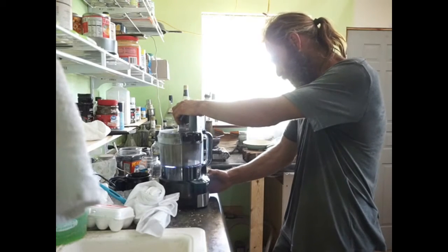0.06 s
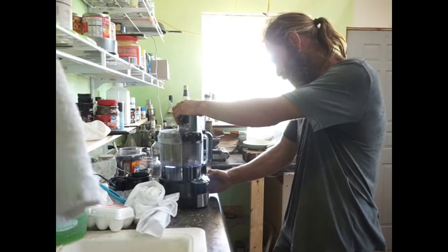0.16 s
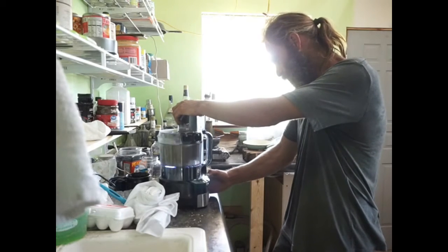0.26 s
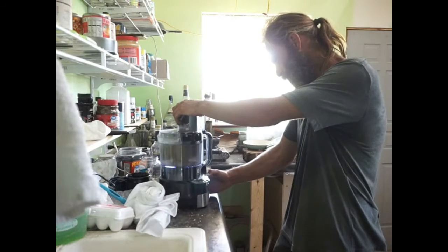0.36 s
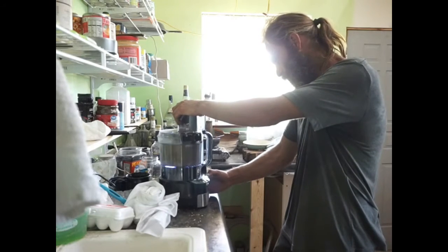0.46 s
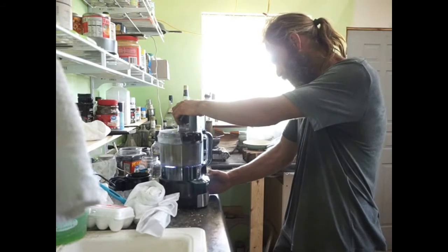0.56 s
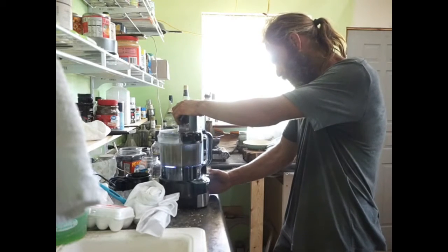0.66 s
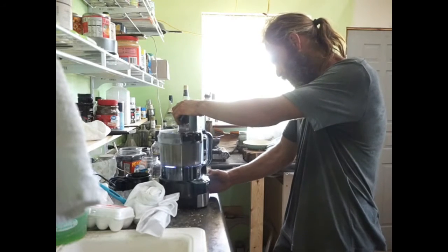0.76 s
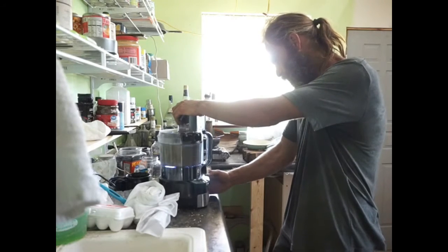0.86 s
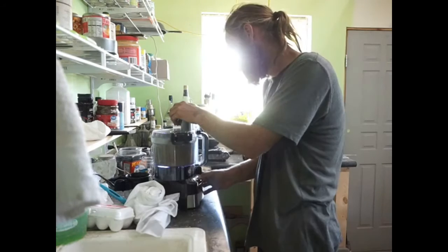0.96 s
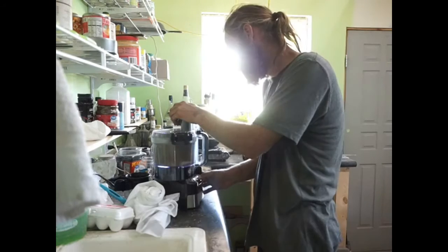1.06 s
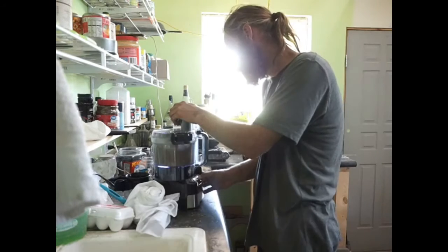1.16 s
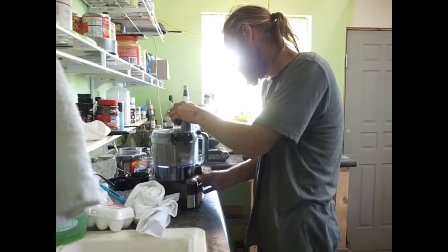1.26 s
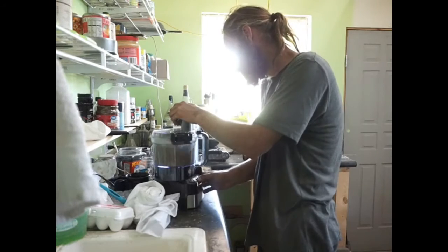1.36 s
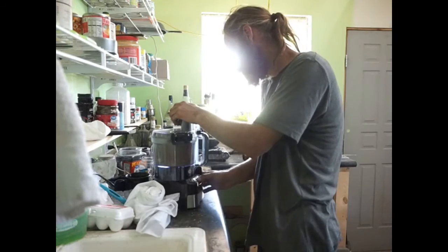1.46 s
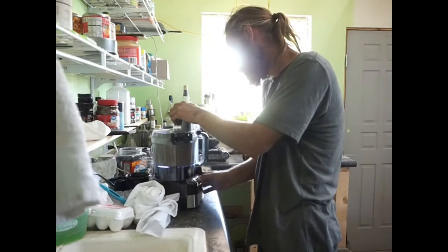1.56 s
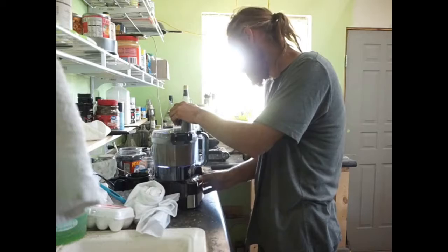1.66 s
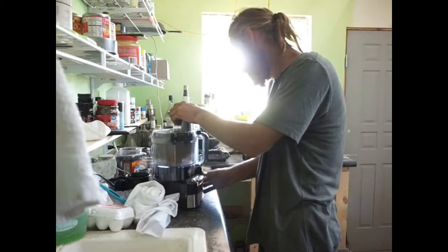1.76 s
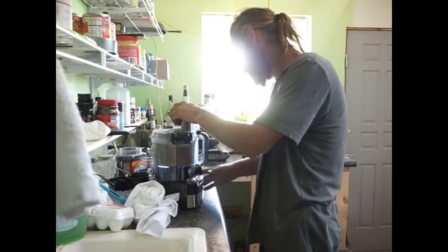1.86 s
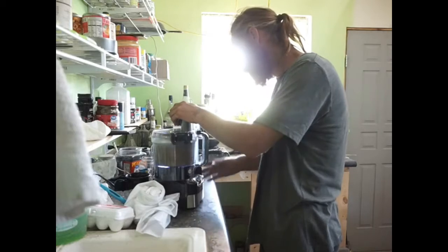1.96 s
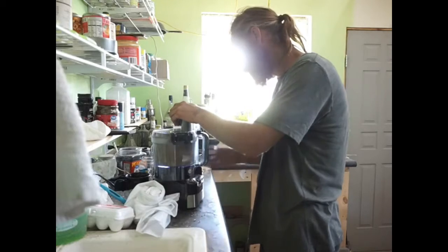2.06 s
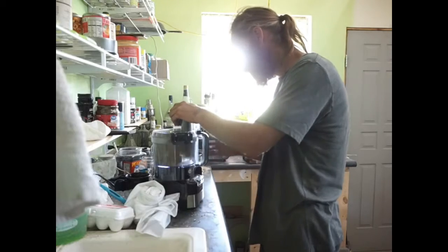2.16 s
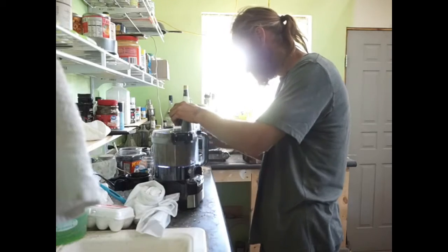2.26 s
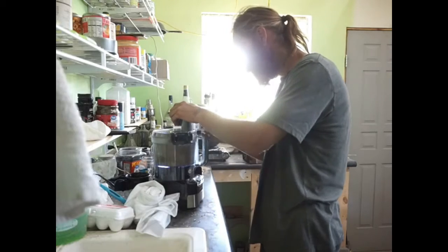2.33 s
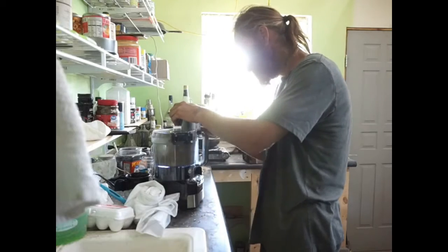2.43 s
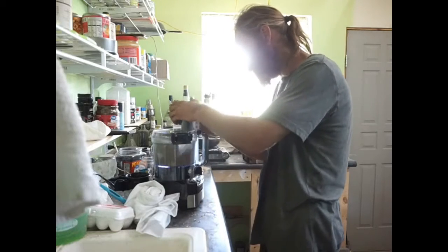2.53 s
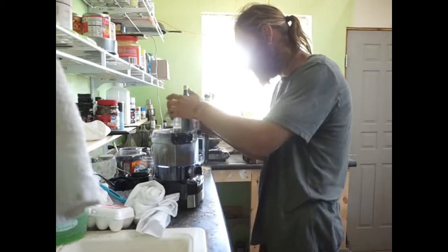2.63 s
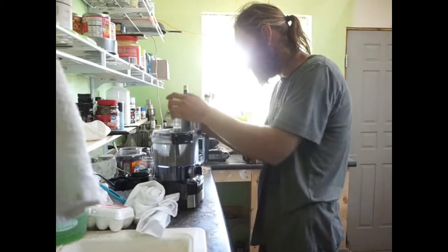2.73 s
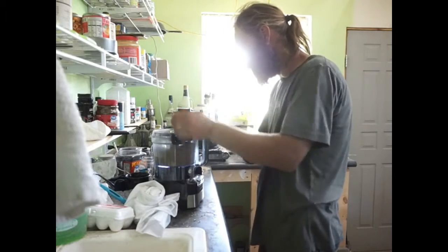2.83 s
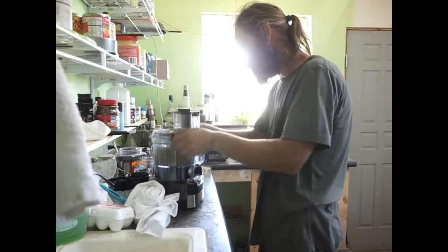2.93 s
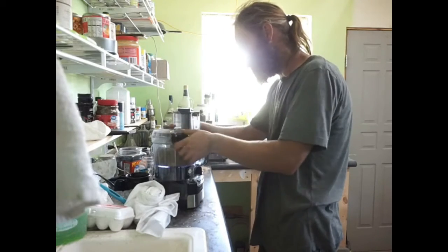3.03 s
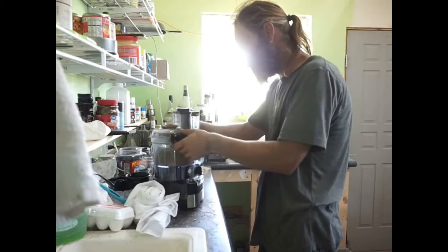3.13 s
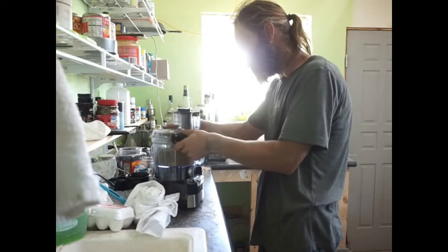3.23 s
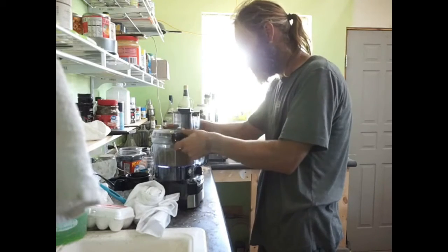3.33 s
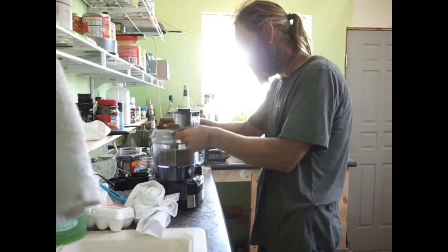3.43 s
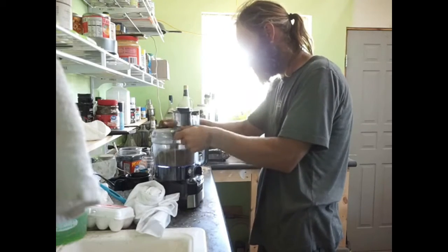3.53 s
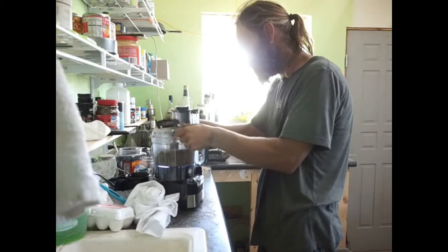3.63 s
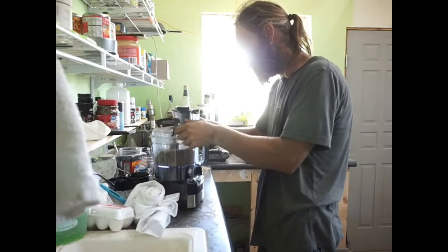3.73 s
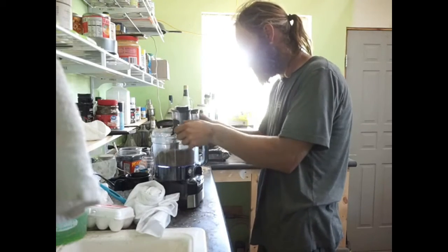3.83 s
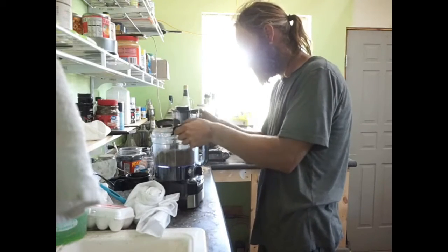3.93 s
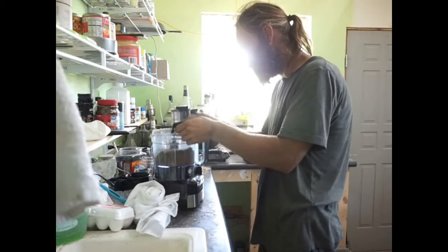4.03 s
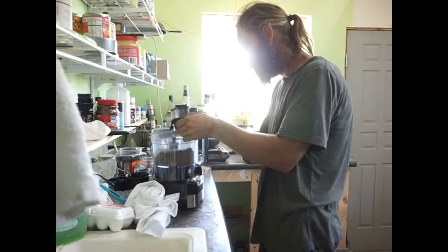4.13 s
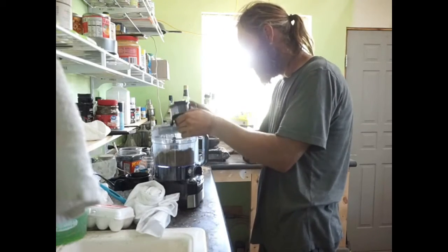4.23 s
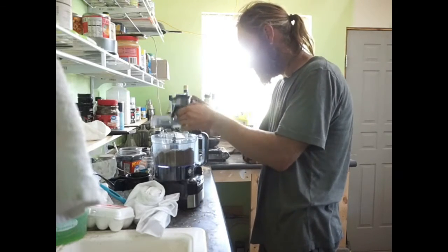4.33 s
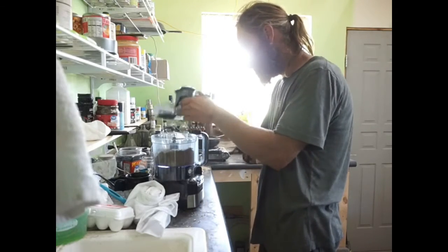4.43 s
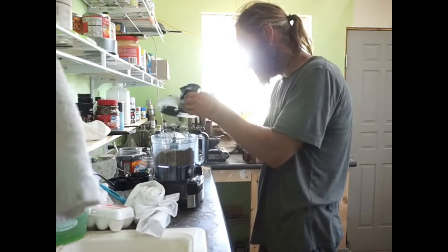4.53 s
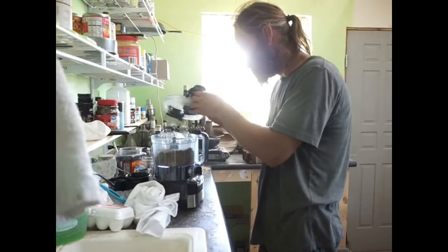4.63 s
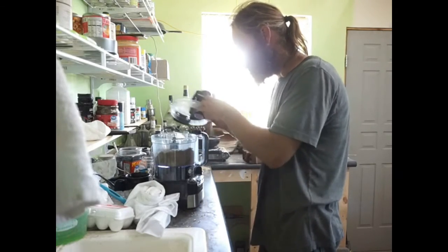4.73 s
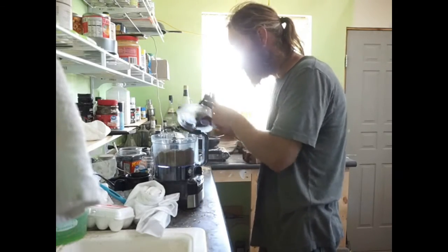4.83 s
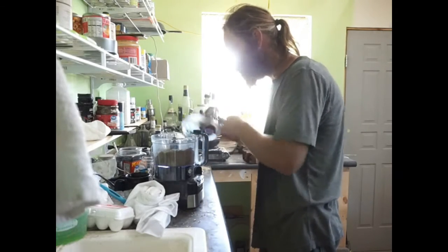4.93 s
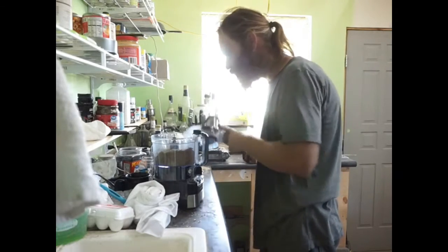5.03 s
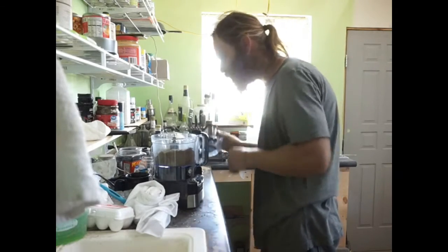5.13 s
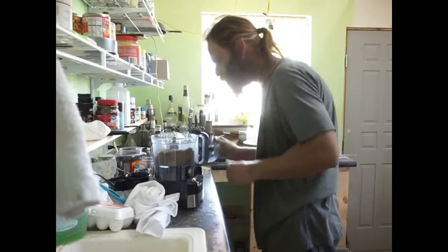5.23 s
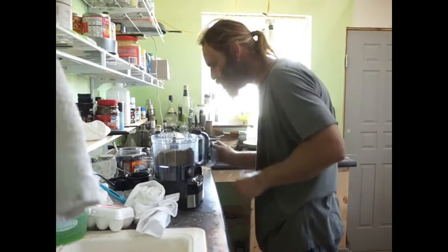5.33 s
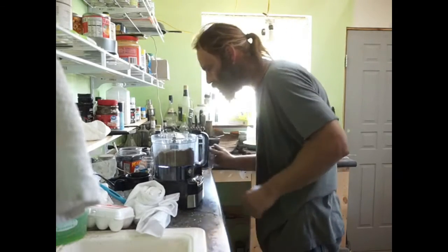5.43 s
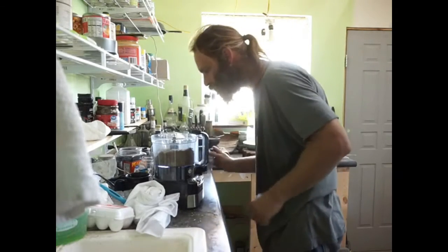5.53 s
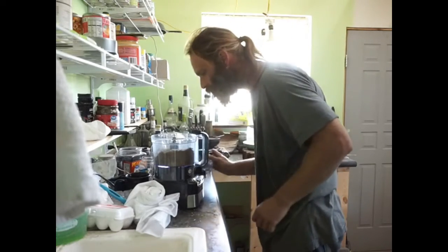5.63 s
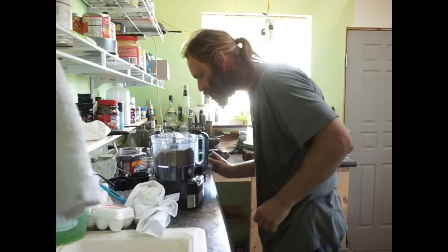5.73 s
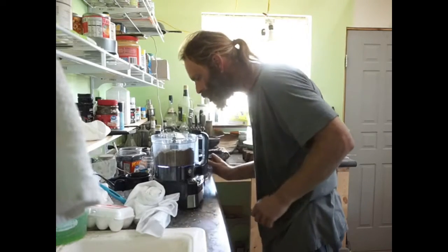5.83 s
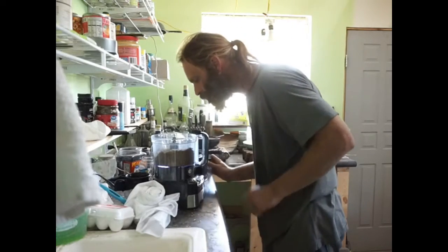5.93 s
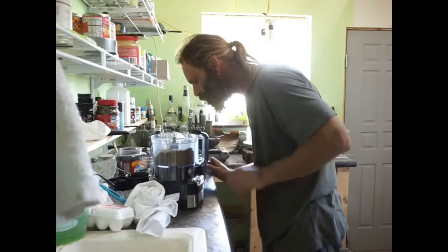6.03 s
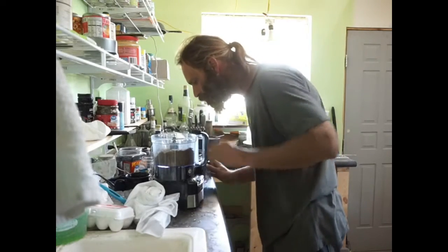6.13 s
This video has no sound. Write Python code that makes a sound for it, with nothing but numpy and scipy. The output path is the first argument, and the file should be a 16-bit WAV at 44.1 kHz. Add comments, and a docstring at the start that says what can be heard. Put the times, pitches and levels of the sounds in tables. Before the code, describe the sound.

A food processor runs close by in a small kitchen, its high unsteady whine over a loud gritty rattle of dry food. It drops in pitch after about a second, then is switched off and slides down to rest. Then the plastic lid rubs, squeaks and clicks free, is put down with hard clacks, and the bowl is scraped and knocked. Faint steady room noise remains.

```python
"""A food processor churns a dry mix in a small kitchen, drops to a lower speed, is switched off and coasts to rest.
One shaft-speed curve drives it all: a whine at ten times the shaft rate, hum, whirr, and noise for the flung food.
Then the lid is twisted loose with a gliding squeak, lifted and set down, and the bowl is gripped and knocked:
noise bursts ring plastic modes for the contacts, and grainy noise makes the rubbing. Room noise lies beneath."""
import sys
import numpy as np
from scipy import signal
from scipy.fft import rfft, irfft, next_fast_len
from scipy.io import wavfile
from scipy.ndimage import uniform_filter1d, map_coordinates

SR = 44100
rng = np.random.default_rng(int(sys.argv[2]) if len(sys.argv) > 2 else 0)


def wrap_up_sound(samples):
    """Save the sound to the file named by the first command line argument, as 16-bit audio."""
    columns = np.atleast_2d(samples).T
    # keep every value between -1 and 1, then stretch to whole-number steps
    tamed = np.clip(columns, -1, 1)
    steps = np.round(tamed * 32767).astype(np.int16)
    wavfile.write(sys.argv[1], SR, steps)


N = 272538

# Room noise spectrum: f/Hz, relative level/dB per Hz
AIR_SPECTRUM = [(24, -89), (40, -70), (70, -39), (212, -35), (302, -13.5), (450, -16.5), (703, -8.5),
                (810, -7.5), (1000, -16), (1100, -7), (1180, -10.5), (1490, -13), (2390, -15.5),
                (2750, -18), (11000, -45.5), (14300, -77), (22000, -120)]
# Resonances in the room noise: f/Hz, width/Hz, lift/dB
AIR_RESONANCES = [(77, 13, 10), (300, 17, 3), (697.5, 33, 11), (989, 6.8, 22.5)]
# Likeness of the two microphones in diffuse sound: f/Hz, correlation (-1 to 1)
MIC_LIKENESS = [(40, .5), (150, .95), (350, .94), (700, .88), (1400, .83), (2800, .72), (4000, .42),
                (5300, .22), (7000, .55), (10000, .52)]
# Decay of the kitchen echo: f/Hz, t60/s
KITCHEN_DECAY = [(150, 0.054), (500, 0.24), (1500, 0.24), (3000, 0.25), (9000, 0.46)]
# Phase by which the left microphone leads (negative: lags): f/Hz, phase/rad
LEFT_LEAD = [(600, -0.26), (1500, 0.73), (2800, 0.68), (4000, 1.57), (5000, 1.5), (6500, 1.2),
             (11000, -1.5)]

# Squeaks of the sticking, slipping lid: t/s, hold/s, f/Hz, glide/Hz per s, level/dB before the stutter,
# pitch scatter (share), stutter/dB, fade/dB per s
LID_SQUEAKS = [(3.413, 0.0044, 2477, 700, -27, 0.0547, 6, 237),
               (3.612, 0.0077, 899, -500, -29.5, 0.0059, -1, 700),
               (3.652, 0.028, 879, -150, -36, 0.0094, -1, 450)]
# Plastic sliding on plastic: t/s, hold/s, rub level/dB, scratch level/dB, f/Hz of the resonance lifted most
SLIDE_STROKES = [(3.042, 0.044, -53.5, -40, 4100), (3.242, 0.0061, -67, -52, 4030),
                 (3.689, 0.0096, -41.5, -39.5, 2380), (4.051, 0.13, -47, -43.5, 2440),
                 (5.81, 0.005, -36, -39.5, 3220), (5.878, 0.059, -47.5, -48, 2520),
                 (5.947, 0.043, -43.5, -43, 3200), (6.007, 0.084, -43, -39, 3130),
                 (6.09, 0.005, -30, -35.5, 3140), (6.17, 0.02, -52, -46, 2430)]
# Low rubbing spectrum: f/Hz, relative level/dB per Hz
RUB_SPECTRUM = [(120, -34), (240, -39), (300, -12), (430, -2), (560, -3.5), (720, 6.5), (1150, -1),
                (1500, -4), (1900, -30)]
# Resonance of the rub: f/Hz, width/Hz, lift/dB
RUB_RESONANCES = [(640, 39, 4.2)]
# High scratching spectrum: f/Hz, relative level/dB per Hz
SCRATCH_SPECTRUM = [(1200, 0.5), (1600, -1.5), (2300, 6.5), (3100, -1.5), (3700, -1), (4400, -3.5),
                    (5200, -9), (8000, -19.5), (11000, -16.5)]
# Lid and bowl contacts, and one small ping as the blade coasts, in three registers:
# t/s, level/dB, clack f/Hz, knock level/dB re clack, knock f/Hz, thud level/dB re clack, thud f/Hz,
# snap level/dB re clack, ringing/dB re chatter, first tap/dB re chatter
CONTACTS = [(2.455, -49, 2800, -20, 900, -32, 300, -22, 15, -12),
            (2.6423, -49, 2700, 6.5, 800, -11.5, 235, -5.5, -1.5, -10),
            (3.055, -69, 4130, 7, 2400, -30, 400, -13, -4, -7),
            (3.092, -64.5, 4160, 6, 2400, -30, 400, -10, -3, -3),
            (3.211, -62.5, 2780, -22, 1010, -30, 400, -14, -11, -4),
            (3.4138, -47.5, 1920, 2, 1080, -5.5, 464, -14, -17, -14),
            (3.4259, -48, 2600, 4, 1250, -14, 273, -5.5, -10, 3),
            (3.4302, -45, 2500, 4, 1170, -3.5, 564, -12, -10, 1),
            (3.4665, -60, 2390, 0, 780, -23, 450, -18, -1, -6),
            (3.7146, -50.5, 2100, 1, 1000, -17, 307, -16, -3, -14),
            (3.7592, -57.5, 1400, 3, 795, -15, 190, -23, 10, -11),
            (3.845, -57.5, 1960, 8, 734, -10, 231, -28, -5, -10),
            (3.93, -66, 1800, -2, 800, -3, 230, -10, -13, -8),
            (4.088, -52, 2180, 5.5, 1100, -13, 183, -28, -3, -11),
            (4.096, -53, 2000, 4, 1280, -11, 200, -28, 0, -14),
            (4.1672, -36, 1940, -8.5, 1010, -39, 215, -11.5, 0, 2.5),
            (4.1745, -40.5, 1960, -10, 1170, -23, 215, -14, 4, -5),
            (4.2765, -42.5, 2310, -12.5, 784, -22.5, 340, -26, 0, -3),
            (4.2835, -51.5, 2740, 1.5, 1680, -17, 337, -28, 4, -10),
            (4.353, -47, 2910, 2, 1540, -10, 535, -14, -5, -11.5),
            (4.4283, -51, 1600, -5.5, 3020, -7.5, 534, -18, -2, -18),
            (4.572, -63.5, 2290, -17, 900, -16, 303, -3, -9, 0),
            (4.8538, -62, 1750, -7, 1000, -26, 400, -30, 2, -6),
            (5.047, -36, 2570, -10, 900, -46, 494, -11, -0.5, 0.5),
            (5.0504, -38, 1840, -6, 940, -40, 494, -18, 5.5, 0),
            (5.1137, -44, 2090, -9, 920, -35, 500, -19, -6, -8),
            (5.311, -64, 1900, 7, 980, -16, 400, -25, 0, -6),
            (5.457, -64.5, 1500, 5, 850, -5, 400, -27, -2, -5),
            (5.8138, -45, 2200, 1, 1040, -9.5, 463, -36, 2, -7),
            (5.837, -52.5, 2300, 7, 1050, -8, 410, -22, -7, -6),
            (5.8946, -63, 1690, 11, 796, 3, 400, 1, 1, -8),
            (6.019, -71, 2960, -2, 780, -20, 420, -12, -3, -5),
            (6.052, -60, 2700, 1, 1160, -20, 420, 0, -1, -5),
            (6.0954, -36.5, 2190, -1, 1120, -9, 420, -22, 0.5, -6.5),
            (6.0993, -45.5, 2210, -6, 950, -1.5, 417, -21, 3.5, 3),
            (6.135, -54, 1450, -5, 770, 7.5, 430, -20, 0, -10)]
# Modes of lid and bowl: f/Hz, relative level/dB, t60/s
PLASTIC_MODES = [(785, -2, .1), (920, 0, .1), (1025, -1, .1), (1160, -3, .09), (1440, -6, .07),
                 (1740, -4, .06), (1900, -2, .055), (2008, 0, .055), (2200, -3, .06), (2400, -1, .06),
                 (2622, -4, .06), (2790, -3, .05), (2960, -2, .05), (3300, 0, .05)]
# Modes of the base on the counter: f/Hz, relative level/dB, t60/s
BASE_MODES = [(191, -16, 0.059), (325, -9, 0.27), (428, 10, 0.23), (518, 18, 0.23)]

# Low resonances of the labouring machine: t/s, hold/s, f/Hz, peak level/dB
MACHINE_BOOMS = [(0.775, 0.022, 518, -30), (0.852, 0.048, 386.3, -31.5)]
# Motor at high speed, sagging as the food drags on the blade: t/s, shaft f/Hz
HIGH_SPEED = [(0, 296), (0.55, 303.3), (0.66, 302), (0.78, 273), (0.945, 289)]
# Food catches the blade and slows it for a moment: t/s, half length/s, shaft f/Hz lost
FOOD_SNAGS = [(0.735, .025, 4), (0.89, .02, 3.5), (1.29, .03, 1.5), (1.54, .07, 2.8), (1.765, .04, 4.5),
              (1.85, .05, 2.2), (2.14, .035, 2.5), (2.25, .07, 2)]
# Whine of the fan before flutter: t/s, level/dB
WHINE_LEVEL = [(0, -26), (0.05, -26), (0.1, -36), (0.17, -33), (0.23, -22.5), (0.68, -22.5), (0.72, -27),
               (0.78, -22.5), (0.805, -26), (0.83, -18), (0.87, -30), (0.91, -23), (0.99, -21.5),
               (1.04, -28), (1.19, -23), (1.26, -30), (1.33, -24.5), (1.4, -30), (1.43, -22.5), (1.47, -29),
               (1.6, -29), (1.665, -36), (1.705, -22), (1.76, -20.5), (1.82, -23.5), (1.88, -20.5),
               (1.96, -21.5), (2.02, -28), (2.08, -23), (2.14, -36), (2.21, -28.5), (2.29, -30.5),
               (2.34, -45)]
# Multiples of the shaft rate heard in the whirr of the drive
WHIRR_ORDERS = (12, 14, 18, 20, 24, 28, 30, 36, 40, 46, 50, 56, 62, 70, 80)

# Flung food and motor brushes, four spectra: f/Hz, relative level/dB per Hz
RUMBLE_SPECTRUM = [(24, -67), (40, -37.5), (151, -18.5), (292, -0.5), (337, -5.5), (380, -1.5), (413, -4.5),
                   (455, 3.5), (578, -0.5), (700, 4.5), (910, -11), (1540, -120)]
RATTLE_SPECTRUM = [(450, -69.5), (650, -18.5), (800, -1.5), (1000, 1), (1300, 0.5), (1750, -4.5),
                   (2050, -5.5), (2700, 3.5), (3300, -5), (4000, -8.5), (5200, -25)]
GRIT_SPECTRUM = [(3000, -63), (4200, 6.5), (5200, 5), (6500, 7.5), (8000, 2), (9300, -3.5), (11000, -6)]
BRUSH_SPECTRUM = [(6500, -17), (8500, 6), (9400, 12), (10000, 16.5), (10500, 16.5), (11000, 7.5)]
# Resonances of the rumble and of the bowl: f/Hz, width/Hz, lift/dB
RUMBLE_RESONANCES = [(384, 19, 7.3), (529, 16, 3.5), (215, 19, 3.2)]
BOWL_RESONANCES = [(790, 66, 5.5), (943, 49, 5.5), (1023, 32, 7.5), (1216, 60, 6), (1477, 105, 7),
                   (1708, 176, 9.5), (2690, 270, -3.5)]
# How each layer grows with the shaft: full level/dB, shaft f/Hz where it is full, power
RUMBLE_LAW = (-34.5, 266, 1.33)
RATTLE_LAW = (-22, 224, 1.16)
GRIT_LAW = (-29.5, 232, 2.58)
SIFT_LAW = (-50, 230, 0.5)
BRUSH_LAW = (-43, 157, 1.21)
CRUMB_LAW = (-35.5, 160, 1.3)
WHIRR_LAW = (-40, 190, 1.0)
SING_LAW = (-27.5, 125, 2.1)

AIR_DB = -49.5
TOP_HZ = 11080  # steep upper band limit of the whole sound
SQUEAK_ATTACK_S, SQUEAK_WET_DB, STUTTER_HZ = 0.016, -7, 50  # the stutter is the stick-slip rate of the lid
STROKE_ATTACK_S, STROKE_FADE_DB_PER_S = 0.014, 223
BOOM_ATTACK_S, BOOM_FADE_DB_PER_S = 0.03, 350
REBOUND_S, REBOUND_DB = 0.0083, -18.5  # a part touches again just after it lands
CRACK_DB, CRACK_T60_S = 1, 0.007  # the sharp first instant of a contact
FAVOUR_DB_PER_OCTAVE = 52  # the spot that is struck favours the modes near its own pitch
LOW_AT_S, LOW_HZ, OFF_AT_S = 0.945, 245.2, 1.388  # step to low speed, its shaft rate, switch-off
COAST_S, FRICTION_HZ = 2.475, 258  # air drag time constant; bearing friction as the speed where drag equals it
STEADY_HZ = 294  # above this shaft rate the motor runs freely and the whine wavers less
FLUTTER_DB, JITTER = 2.9, 0.005  # whine waver below STEADY_HZ: scale of level, and of pitch as a share
WHINE_PAN_DB = -4  # left minus right, while the motor runs freely
WHINE_FADE_DB_PER_S = 64  # once the fan is too slow to sing
HUM_DB, HUM_POWER, HUM_CUT_HZ = -47, 0.98, 163  # rms at low speed, growth with speed, shaft rate where it fades
HOUSING_HZ, HOUSING_WIDTH_HZ = 2720, 240
SETTLE_HZ = 22  # shaft rate around which the food comes to lie still
CRUMBS_PER_TURN = 1.6


def amp(db):
    """Turn decibels into gain."""
    return 10 ** (np.asarray(db) / 20)


def unit(x):
    """Scale to rms 1."""
    return x / np.sqrt(np.mean(x ** 2) + 1e-20)


def along(points, hz):
    """Read (f/Hz, value) points on a log frequency axis."""
    f, value = np.transpose(points)
    return np.interp(np.log(hz + 1), np.log(f + 1), value)


def curve(points):
    """Draw (t/s, value) points as one automation value per sample."""
    t, value = np.transpose(points)
    return np.interp(np.arange(N) / SR, t, value)


def wobble(rate):
    """A smooth random modulator with rate knots a second."""
    knots = rng.standard_normal(int(N * rate / SR) + 4)
    return map_coordinates(knots, [np.arange(N) * rate / SR])


def envelope(start_s, attack_s, hold_s, fade_db_per_s):
    """Rise linearly, hold, then die away at a steady rate in dB."""
    t = np.arange(N) / SR - start_s
    fade_db = fade_db_per_s * np.maximum(0, t - attack_s - hold_s)
    return np.clip(t / attack_s, 0, 1) * amp(-fade_db)


def filtered(x, response):
    """Shape x with a response given as a function of frequency."""
    n = x.shape[-1]
    padded = next_fast_len(n + 4096)
    hz = np.fft.rfftfreq(padded, 1 / SR)
    return irfft(rfft(x, padded) * response(hz), padded)[..., :n]


def band(x, lo_hz, hi_hz, order=3):
    """Causal band-pass."""
    sos = signal.butter(order, [lo_hz, hi_hz], "band", fs=SR, output="sos")
    return signal.sosfilt(sos, x)


def spread(pair):
    """Blend two unrelated signals into a diffuse field at two close microphones."""
    def mid_side(hz):
        turn = np.arccos(np.clip(along(MIC_LIKENESS, hz), -1, 1)) / 2
        return np.array([np.cos(turn), np.sin(turn)])

    mid, side = filtered(pair, mid_side)
    return np.array([mid + side, mid - side])


def rush(spectrum, resonances=(), drive=None):
    """Stereo noise (or a given drive) of rms 1, coloured by a spectrum and resonant lifts."""
    if drive is None:
        drive = rng.standard_normal((2, N))

    def colour(hz):
        lift_db = sum(db / (1 + (2 * (hz - centre) / width) ** 2) for centre, width, db in resonances)
        low_skirt = np.minimum(1, hz / spectrum[0][0]) ** 2
        high_skirt = np.minimum(1, spectrum[-1][0] / (hz + 1)) ** 2
        return amp(along(spectrum, hz) + lift_db) * low_skirt * high_skirt

    return unit(spread(filtered(drive, colour)))


def grains(rate, share):
    """Tiny impacts, rate a second, over noise for their echoes; share is the impacts' part of the power."""
    chance = np.clip(rate / SR, 1e-4, 1)
    hits = (rng.random(N) < chance) * rng.standard_normal((2, N)) / np.sqrt(chance)
    return np.sqrt(share) * hits + np.sqrt(1 - share) * rng.standard_normal((2, N))


def kitchen(x, wet_db):
    """Direct sound plus a short stereo tail from walls and shelves, the decay set by frequency."""
    hz, t, bins = signal.stft(rng.standard_normal((2, SR // 2)), SR, nperseg=256)
    decay = amp(-60 * t / along(KITCHEN_DECAY, hz)[:, None])
    tail = spread(signal.istft(bins * decay, SR, nperseg=256)[1])
    tail = np.pad(tail / np.linalg.norm(tail[0]), ((0, 0), (SR // 400, 0)))  # 2.5 ms pre-delay
    echo = signal.fftconvolve(x[None], tail, axes=1)[:, :len(x)]
    return (x + amp(wet_db) * echo) / np.sqrt(1 + amp(2 * wet_db))


def room_air():
    """Room noise: a coloured, resonant noise bed whose level drifts slowly."""
    return amp(AIR_DB + 0.78 * wobble(1.03)) * rush(AIR_SPECTRUM, AIR_RESONANCES)


def squeaks():
    """The tight lid sticks and slips: a rough stuttering squeal, then a clean sinking note in two slips."""
    out, t = np.zeros(N), np.arange(N) / SR
    for start, hold, hz, glide, db, scatter, stutter_db, fade_db_per_s in LID_SQUEAKS:
        pitch = (hz + glide * (t - start)) * (1 + scatter * wobble(400))
        phase = 2 * np.pi * np.cumsum(pitch) / SR
        stutter = np.cos(2 * np.pi * STUTTER_HZ * (t - start - SQUEAK_ATTACK_S))
        level = amp(db + stutter_db * stutter) * envelope(start, SQUEAK_ATTACK_S, hold, fade_db_per_s)
        out += level * np.sqrt(2) * (np.sin(phase) + amp(-22) * np.sin(2 * phase))
    return kitchen(out, SQUEAK_WET_DB)


def slides():
    """Plastic rims rub in tiny uneven slips: grainy noise in a low rub and a resonant scratch."""
    out = np.zeros((2, N))
    rub = amp(2.3 * wobble(70)) * rush(RUB_SPECTRUM, RUB_RESONANCES, grains(590, share=0.53))
    for start, hold, rub_db, scratch_db, hz in SLIDE_STROKES:
        scratch = rush(SCRATCH_SPECTRUM, [(hz, 280, 9)], grains(270, share=0.27))
        stroke = amp(rub_db) * rub + amp(scratch_db + 0.25 * wobble(90)) * scratch
        out += envelope(start, STROKE_ATTACK_S, hold, STROKE_FADE_DB_PER_S) * stroke
    return out


def burst(t60):
    """Half a second of noise dying away exponentially."""
    n = SR // 2
    return rng.standard_normal(n) * amp(-60 * np.arange(n) / SR / t60)


def ringing(centre_hz, modes):
    """Decaying sines of the modes within an octave of the struck pitch, the nearest favoured."""
    t = np.arange(SR // 2) / SR
    out = np.zeros(len(t))
    for hz, db, t60 in modes:
        octaves = abs(np.log2(hz / centre_hz))
        if octaves < 1:
            gain = amp(db + rng.normal(0, 2.6) - FAVOUR_DB_PER_OCTAVE * octaves) * rng.choice([-1, 1])
            tone = np.sin(2 * np.pi * hz * rng.normal(1, 0.0014) * t)
            out += gain * np.exp(-np.log(1000) * t / t60) * tone
    return out


def register(centre_hz, width, t60, modes, ring_db, tap_db):
    """One pitch region of a contact: a sharp tap and a brief chatter that ring on in nearby modes."""
    def colour(x):
        return unit(band(x, centre_hz / width, centre_hz * width))

    chatter = colour(burst(t60) + amp(CRACK_DB) * burst(CRACK_T60_S))
    tap = colour(1. * (np.arange(SR // 2) == 0))
    ring = unit(ringing(centre_hz, modes))
    return unit(amp(tap_db) * tap + chatter + amp(ring_db) * ring)


def knock(clack_hz, knock_db, knock_hz, thud_db, thud_hz, snap_db, ring_db, tap_db):
    """One contact: the lid clacks, the bowl knocks and the base thuds, with a snap of wide-band noise."""
    clack = 1.11 * register(clack_hz, 1.38, 0.048, PLASTIC_MODES, ring_db, tap_db)
    body = amp(knock_db) * register(knock_hz, 1.45, 0.054, PLASTIC_MODES, ring_db, tap_db)
    thud = amp(thud_db) * register(thud_hz, 1.5, 0.095, BASE_MODES, ring_db, tap_db)
    snap = amp(snap_db) * unit(band(burst(0.058), 1030, 5800, order=2))
    return band(clack + body, 550, 9200) + band(thud, 137, 1600) + snap


def knocks():
    """The small ping and every contact of lid and bowl, each with a softer rebound and its own echo."""
    out = np.zeros((2, N + SR))
    for start, db, *colour in CONTACTS:
        first = knock(*colour)
        rebound = np.pad(knock(*colour), (round(REBOUND_S * SR), 0))[:len(first)]
        blow = amp(db) * kitchen(first + amp(REBOUND_DB) * rebound, wet_db=1.0)
        out[:, round(start * SR):][:, :blow.shape[1]] += blow
    return out[:, :N]


def booms():
    """Low resonances of the machine swell while the blade labours: sines with a little pitch scatter."""
    out = np.zeros(N)
    for start, hold, hz, db in MACHINE_BOOMS:
        phase = 2 * np.pi * np.cumsum(hz * (1 + 0.019 * wobble(90.0))) / SR
        out += amp(db) * envelope(start, BOOM_ATTACK_S, hold, BOOM_FADE_DB_PER_S) * np.sin(phase)
    return kitchen(out, wet_db=-14)


def shaft_speed():
    """High speed, a step down to low, then drag and friction bring the shaft to rest; food snags it on the way."""
    t = np.arange(N) / SR
    drag = np.exp(-np.maximum(0, t - OFF_AT_S) / COAST_S)
    low_then_coast = (LOW_HZ + FRICTION_HZ) * drag - FRICTION_HZ
    snags = sum(lost_hz * np.exp(-((t - centre) / half) ** 2) for centre, half, lost_hz in FOOD_SNAGS)
    return np.maximum(0, np.where(t < LOW_AT_S, curve(HIGH_SPEED), low_then_coast) - snags)


def driven(shaft_hz, db, full_hz, power):
    """Gain that grows as a power of shaft speed until it is full."""
    return amp(db) * np.minimum(1, shaft_hz / full_hz) ** power


def crumbs(shaft_hz):
    """Coarse bits tick singly against the bowl, ever fewer as the blade slows: band-passed random impulses."""
    hits = (rng.random(N) < CRUMBS_PER_TURN * shaft_hz / SR) * rng.uniform(-0.98, 1, N)
    ticks = unit(band(hits, 1060, 3600, order=2))
    return driven(shaft_hz, *CRUMB_LAW) * kitchen(ticks, wet_db=0)


def churn(shaft_hz):
    """The blade flings food at the bowl wall: noise and impacts that thin out with speed, down to a faint sift."""
    impacts = 9 * shaft_hz  # per second
    surge_db = 0.99 * wobble(22.91)
    rumble = rush(RUMBLE_SPECTRUM, RUMBLE_RESONANCES)
    rumble = driven(shaft_hz, *RUMBLE_LAW) * amp(surge_db + 0.47 * wobble(15.0)) * rumble
    rattle = rush(RATTLE_SPECTRUM, BOWL_RESONANCES, grains(impacts, share=0.17))
    rattle = driven(shaft_hz, *RATTLE_LAW) * amp(surge_db) * rattle
    fines = np.hypot(driven(shaft_hz, *GRIT_LAW), driven(shaft_hz, *SIFT_LAW))
    grit = fines * amp(1.3 * surge_db) * rush(GRIT_SPECTRUM, drive=grains(impacts, share=0.33))
    brushes = driven(shaft_hz, *BRUSH_LAW) * rush(BRUSH_SPECTRUM)
    moving = 1 - np.exp(-(shaft_hz / SETTLE_HZ) ** 2)
    return (rumble + rattle + grit + brushes) * moving


def whirr(shaft_hz):
    """A faint comb of high shaft orders slides down as the drive coasts: band-passed sines locked to the shaft."""
    angle = 2 * np.pi * np.cumsum(shaft_hz) / SR
    comb = sum(np.sin(k * angle + rng.uniform(0, 2 * np.pi)) for k in WHIRR_ORDERS)
    return driven(shaft_hz, *WHIRR_LAW) * kitchen(unit(band(comb, 2300, 3920, order=2)), wet_db=4)


def fan_whine(shaft_hz, angle, waver):
    """Ten fan blades pass each turn: a tone at ten times the shaft rate, its level fluttering by waver."""
    blades = np.sin(10 * angle) + amp(-36.0) * np.sin(20 * angle)
    flutter_db = FLUTTER_DB * waver * (np.tanh(1.5 * wobble(70)) + .6 * wobble(170) - .4)
    dying_db = WHINE_FADE_DB_PER_S * np.maximum(0, np.arange(N) / SR - WHINE_LEVEL[-1][0])
    whine = amp(curve(WHINE_LEVEL) - dying_db + flutter_db) * blades
    running_freely = uniform_filter1d(1. * (shaft_hz > STEADY_HZ), SR // 20)
    pan = amp(WHINE_PAN_DB * running_freely * np.array([[.5], [-.5]]))
    return pan * kitchen(whine, wet_db=-16)


def shaft_hum(shaft_hz, angle):
    """Shaft unbalance: a sine at the shaft rate, growing with speed and fading out when slow."""
    fade = 1 - np.exp(-(shaft_hz / HUM_CUT_HZ) ** 6)
    return amp(HUM_DB) * (shaft_hz / LOW_HZ) ** HUM_POWER * fade * np.sin(angle)


def housing_song(shaft_hz, angle):
    """Higher shaft orders sing briefly and roughly as they sweep through a housing resonance."""
    singing = np.zeros(N)
    for order in (22, 33, 44):
        detune = 2 * (order * shaft_hz - HOUSING_HZ) / HOUSING_WIDTH_HZ
        singing += np.sin(order * angle + 1.1 * wobble(260)) / (1 + detune ** 2)
    singing = singing * driven(shaft_hz, *SING_LAW) * amp(2.2 * wobble(150))
    return kitchen(singing, wet_db=2)


def motor(shaft_hz):
    """Whine, hum and housing share one shaft angle, its speed jostled by the food."""
    waver = np.where(shaft_hz > STEADY_HZ, .3, 1)  # stronger below the free-running speed
    jostle = JITTER * waver * (.5 * wobble(45) + wobble(260))
    angle = 2 * np.pi * np.cumsum(shaft_hz * (1 + jostle)) / SR
    tones = fan_whine(shaft_hz, angle, waver) + shaft_hum(shaft_hz, angle) + housing_song(shaft_hz, angle)
    return np.sqrt(2) * tones  # a sine of peak 1 becomes rms 1


def scene():
    """The steady noise of the room, the handling of the lid and bowl, and the machine."""
    shaft_hz = shaft_speed()
    handling = squeaks() + slides() + knocks()
    machine = booms() + crumbs(shaft_hz) + churn(shaft_hz) + whirr(shaft_hz) + motor(shaft_hz)
    return room_air() + handling + machine


def record(dry):
    """Offset the phase of the two microphones by frequency and cut everything above the band limit."""
    def microphones(hz):
        phase = .5 * along(LEFT_LEAD, hz) * np.array([[1], [-1]])
        return np.exp(1j * phase) / (1 + (hz / TOP_HZ) ** 160)

    return filtered(dry, microphones)


dry = scene()
out = record(dry)
wrap_up_sound(out)
```